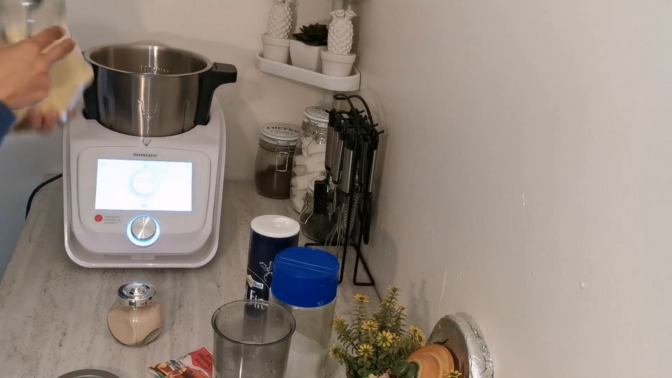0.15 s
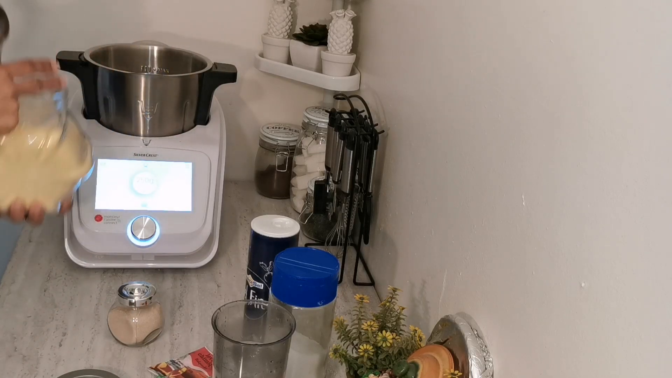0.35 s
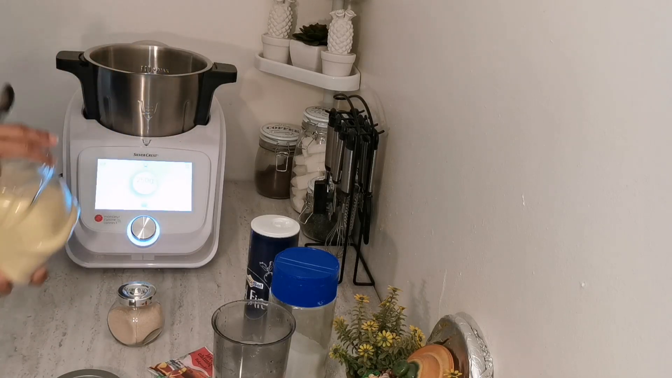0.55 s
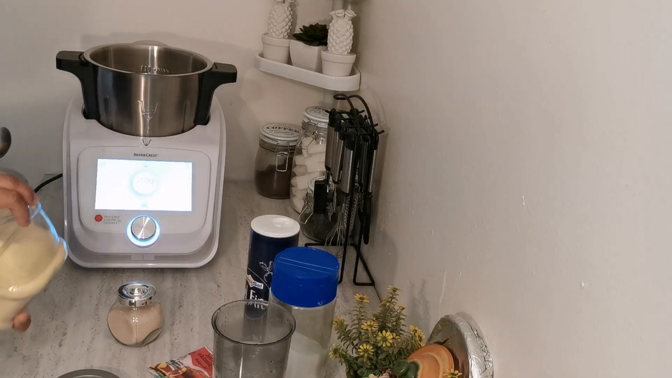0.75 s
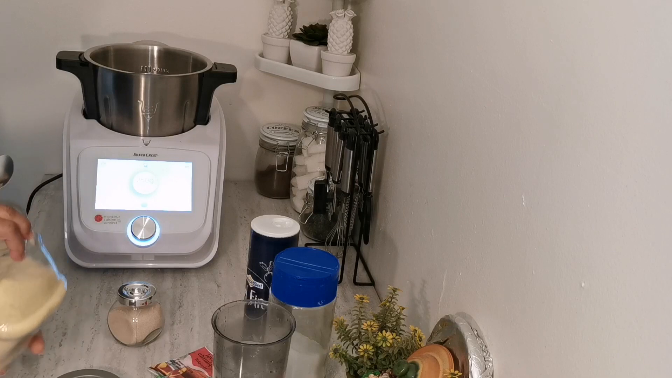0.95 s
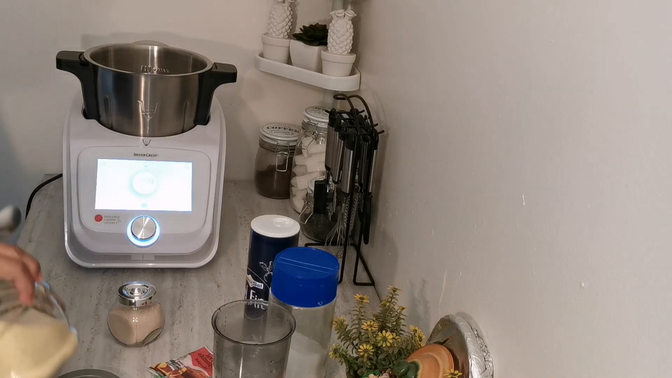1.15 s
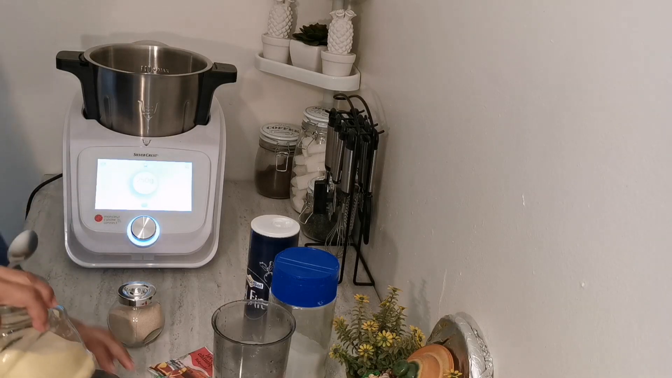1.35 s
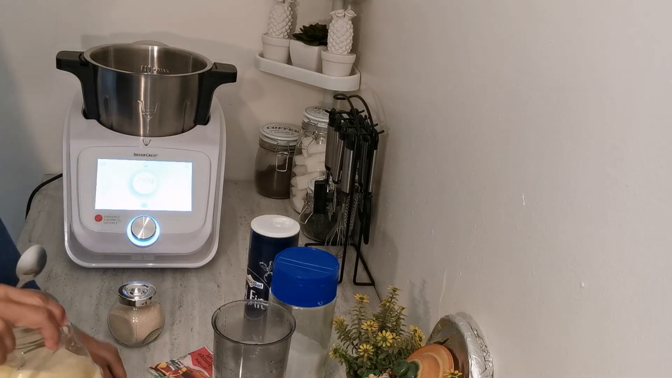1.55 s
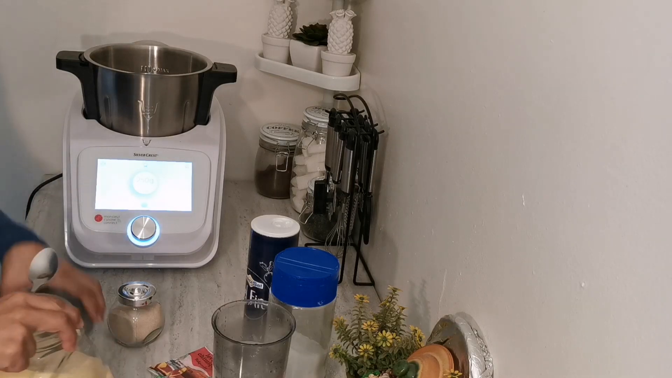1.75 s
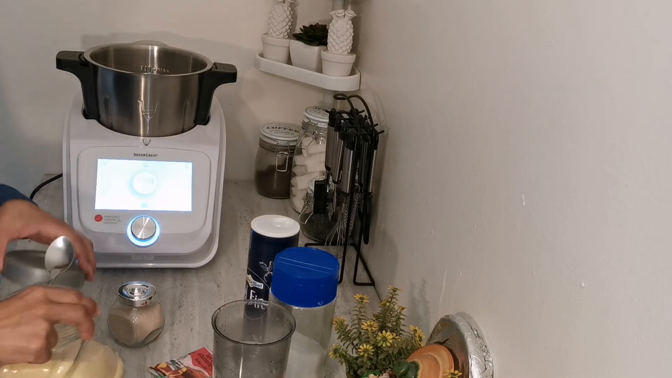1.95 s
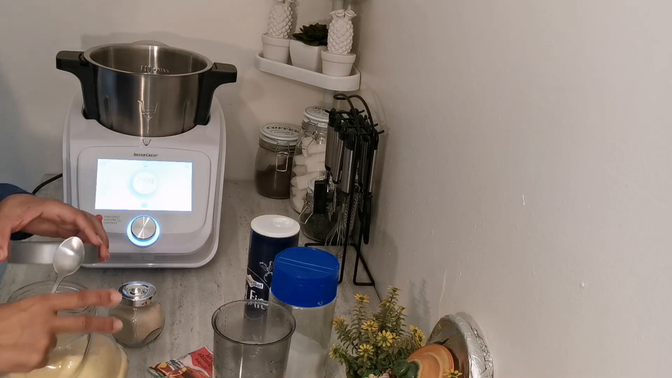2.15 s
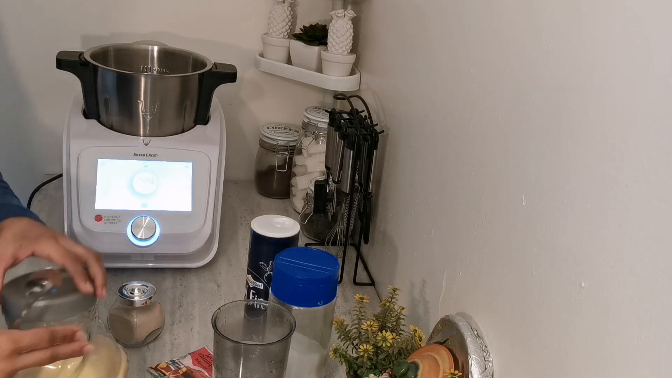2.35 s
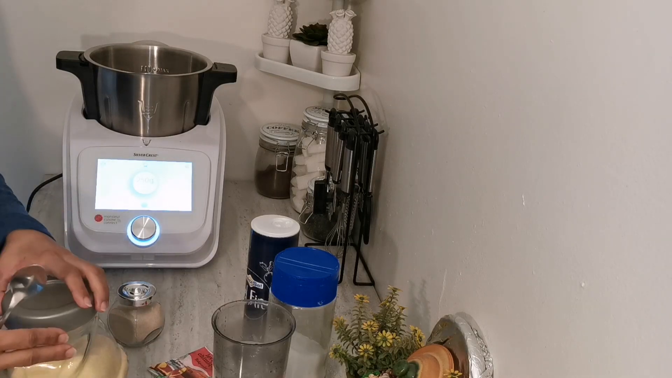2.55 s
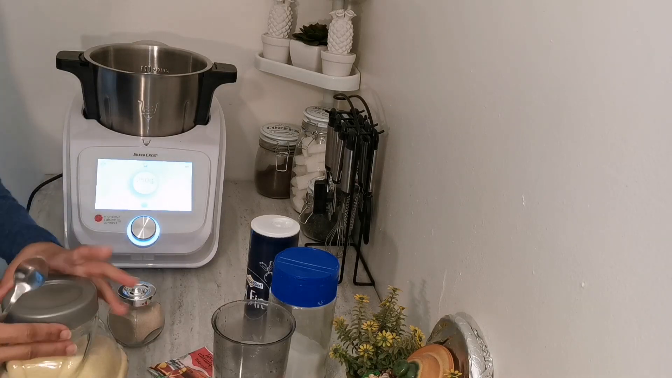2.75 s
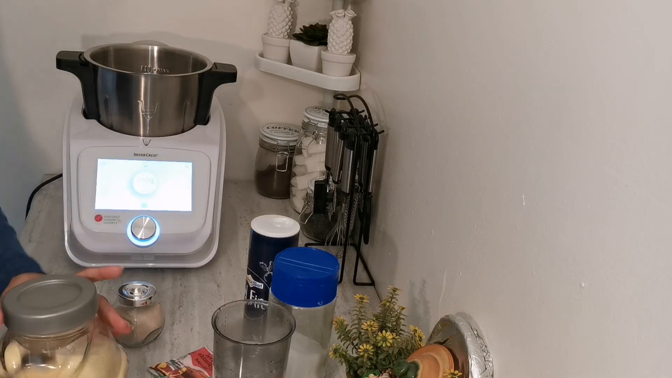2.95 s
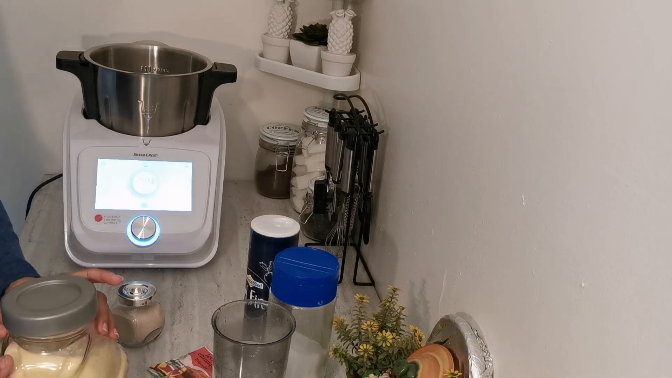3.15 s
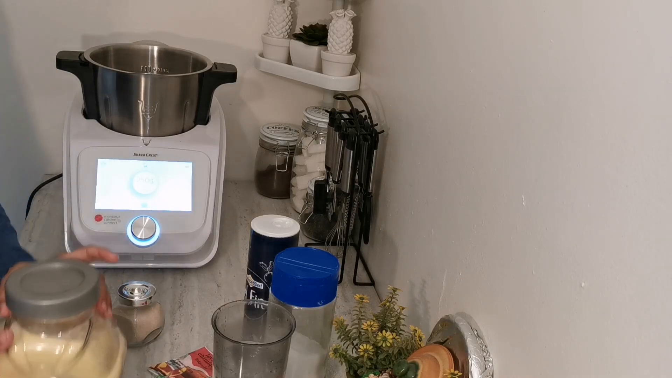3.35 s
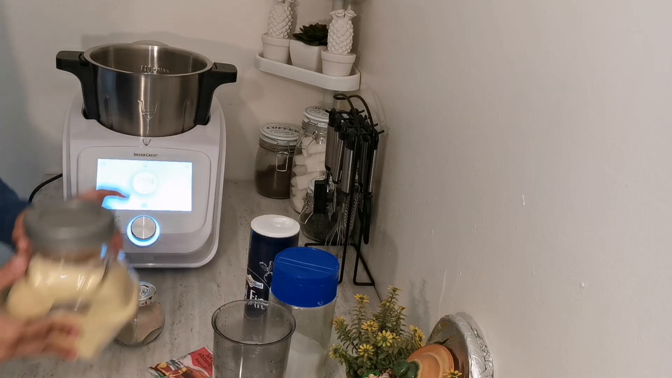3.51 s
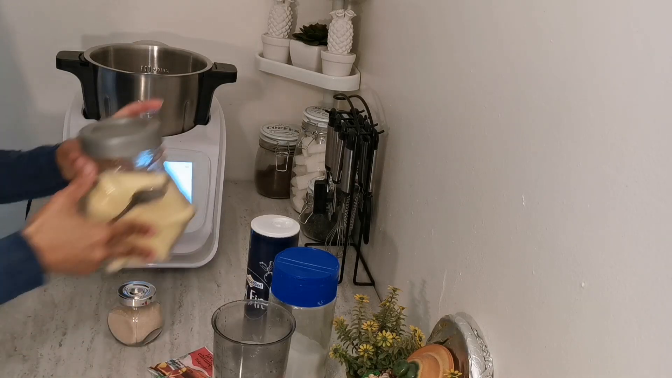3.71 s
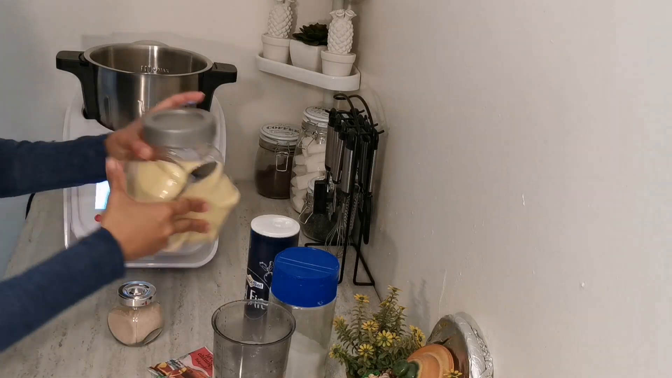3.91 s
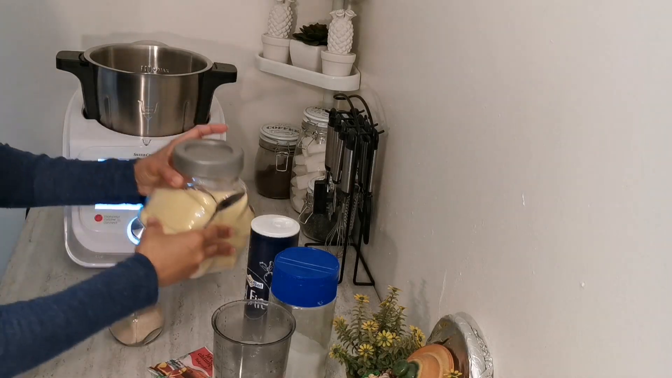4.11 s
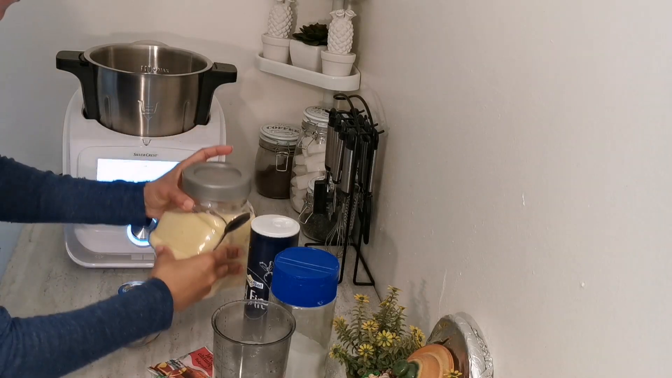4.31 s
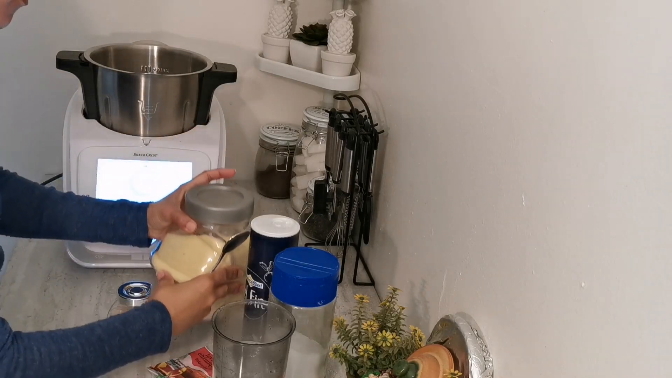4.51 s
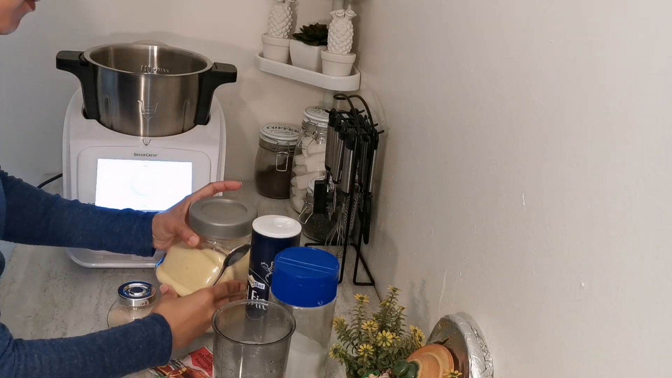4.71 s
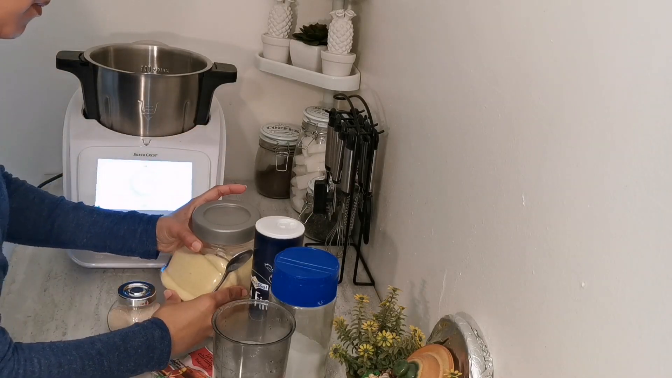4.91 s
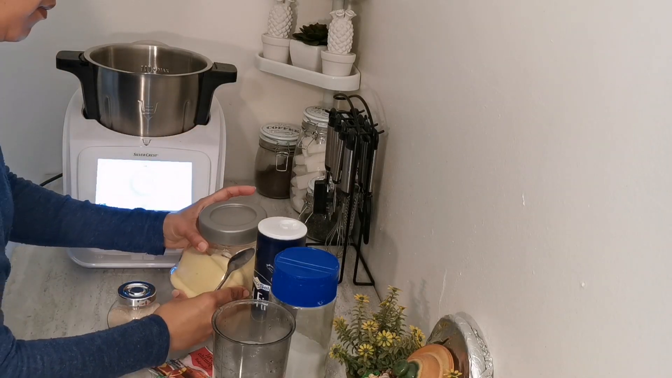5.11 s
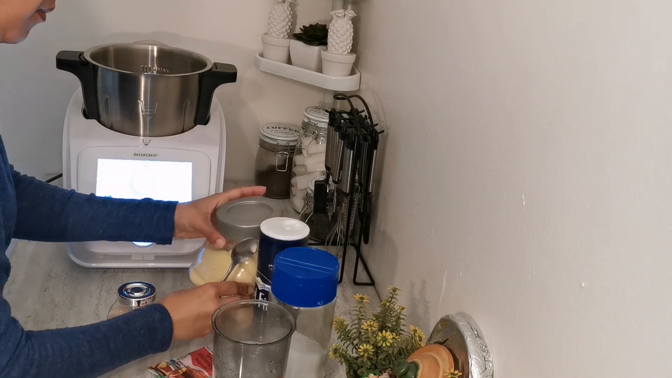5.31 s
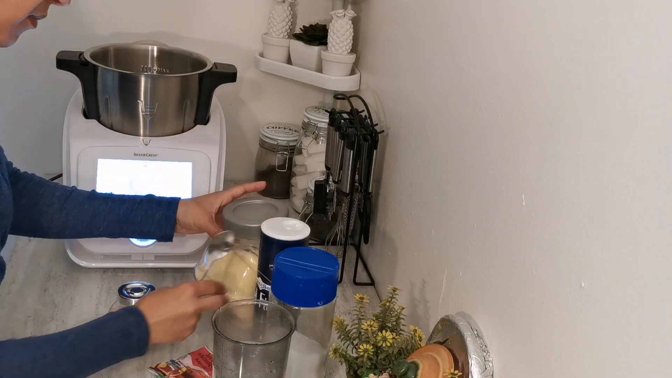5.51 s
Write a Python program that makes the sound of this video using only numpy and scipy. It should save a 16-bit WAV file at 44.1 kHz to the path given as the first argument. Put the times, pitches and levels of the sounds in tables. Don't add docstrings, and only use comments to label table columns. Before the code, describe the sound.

In a small tiled kitchen with faint fan noise, a metal spoon clinks once on a full glass jar. A thin lid scrapes and taps, the jar lands with a hollow thud and rocks, and the spoon ticks brightly on the lid. The lid is pressed and turned with small knocks. After a quiet gap the jar is thumped down further back, nudged and rocked. Close stereo microphone, leaning slightly right.

```python
import sys
import numpy as np
from scipy import signal
from scipy.fft import rfft, irfft, next_fast_len
from scipy.io import wavfile
from scipy.ndimage import map_coordinates

SR = 44100
rng = np.random.default_rng(int(sys.argv[2]) if len(sys.argv) > 2 else 0)


def transcribe(signal):
    frames = np.atleast_2d(signal).T
    limited = np.clip(frames, -1, 1)
    pcm = np.round(limited * 32767).astype(np.int16)
    wavfile.write(sys.argv[1], SR, pcm)


def invert_db(x):
    u = np.asarray(x, float) / 20
    return 10 ** u


N = 245637

TAIL = 2 * SR // 5
HELD = 0.16
RUN_UP_DB = 12
RUMBLE_DB, RUMBLE_GROWS_DB_PER_S = -58.5, 0.6
FAN_DB, WHIR_DB = -73, -84
BASS_CUT_HZ = 45
SNAP_S, SNAP_DB = 2.2632, -33

# (frequency [Hz], density [dB/Hz])
LOW_AIR = [(12, -38.5), (20, 9.5), (59, 2.5), (76, -11), (107, 0.5), (151, -11), (167, -11), (203, -6.5),
           (238, -17), (274, -10), (297, -31), (325, -13.5), (450, -47.5), (580, -49), (990, -120)]
FAN = [(180, -32.5), (300, -5.5), (476, -6.5), (517, 0.5), (571, -8.5), (755, -6.5), (820, -6),
       (1140, -12.5), (1670, -9.5), (2170, -11.5), (2360, -14.5), (4950, -18), (7110, -27), (8380, -22),
       (15400, -31)]
# (centre [Hz], half-width [Hz])
WHIR = (1690, 150)
# (frequency [Hz], correlation [-1..1])
AIR_ALIKE = [(60, 0.66), (180, 0.82), (550, 0.15), (1650, -0.11), (4970, 0.055), (15000, -0.087)]
ROOM_ALIKE = [(100, 1), (300, 0.82), (700, 0.46), (1500, -0.11), (4000, -0.0063)]
# (frequency [Hz], t60 [s])
KITCHEN_T60 = [(100, 0.45), (400, 0.29), (2000, 0.41), (6000, 0.39), (14000, 0.31)]
# (frequency [Hz], L-R [dB])
LEAN = [(100, -3.5), (1000, -3.5), (3000, -3), (10000, -7)]

# (time [s], peak [dB], L-R [dB])
SPOON_ON_GLASS = [
    (0.7203, -27.5, -3),
]
SPOON_ON_LID = [
    (2.2626, -20.5, 0),
]
# (time [s], peak [dB])
GLASS_RINGS = [
    (0.72, -41.5),
]
LID_RINGS = [
    (1.707, -32.5),
]
LID_BUMPS = [
    (1.68, -32),
]
SPOON_RINGS = [
    (2.2635, -44.5),
]
# (frequency [Hz], level [dB], t60 [s])
GLASS_HELD = [(1516, -12, 0.37), (2325, -7, 0.24), (2740, -10.5, 0.3), (3490, 4, 0.097), (4320, 2.5, 0.17),
              (4375, -3.5, 0.25), (4750, -10, 0.31), (4870, 0, 0.19), (5380, -13, 0.14), (6230, -12, 0.25),
              (6440, -8, 0.13), (8000, -13, 0.16), (8130, -4, 0.36), (8600, -26, 0.68), (9170, -13, 0.3),
              (10420, -69, 5.0), (10750, -6, 0.22), (11300, -23, 0.18), (12300, -16, 0.28),
              (12300, -26, 0.2)]
GLASS_BELL = [(4200, -15, 0.29), (4190, -10, 0.27), (4300, -12, 0.18), (5070, -14, 0.14), (5920, -10, 0.13),
              (7860, -22, 0.3), (8380, -6.5, 0.42), (606, -12, 0.13), (385, -2.5, 0.038),
              (916, -6.5, 0.036)]
GLASS_RING = [(2780, -16, .15), (3430, -6, .13), (4262, -7, .25), (4277, -7, .25), (4309, -4, .27),
              (4333, 2, .3), (4374, -6, .25), (4447, -11, .27), (4900, -11, .22), (4972, -10, .25),
              (4530, -9, .25), (5920, -13, .3), (8296, -11, .26), (8344, -8, .28)]
SPOON_HELD = [(2177, -4.5, 0.3), (4145, -9.5, 0.46), (4820, -3, 0.28), (5036, 4, 0.25), (5730, -13, 0.18),
              (6420, -2.5, 0.19), (7000, -13, 0.12), (7590, -4.5, 0.28), (8390, -0.5, 0.25),
              (10940, -3.5, 0.23), (11400, -28, 0.21)]
SPOON_BELL = [(2207, -5, .35), (2950, -7, .25), (3300, -12, .25), (4818, -3, .26), (5076, -1, .27),
              (5335, -6, .35), (5642, -8, .3), (6342, -6, .36), (7515, -9, .31), (8236, -7, .32),
              (8905, -7, .25), (10950, -7, .3), (11600, -10, .24), (12830, -13, .21)]
LID_HELD = [(865, -4, 0.4), (891, 4.5, 0.61), (930, 1.5, 0.63), (1010, 2, 0.5), (1260, -3, 0.22),
            (1440, -7, 0.098), (1400, -11, 0.34), (1810, -18, 0.11), (1958, -15.5, 0.6), (2170, -13, 0.059),
            (2400, -18, 0.11), (2770, -20.5, 0.062)]
LID_BELL = [(872, -7.5, 0.16), (942, -6.5, 0.25), (956, -4, 0.41), (1460, -10, 0.19), (1403, -6.5, .26),
            (1730, -14, 0.27), (2060, -20.5, 0.27), (2455, -11, 0.34), (2630, -19.5, 0.52)]
LID_BUMP = [(850, -4, .1), (1010, -3, .1), (1280, 0, .14), (1400, -3, .12), (1500, -4, .1),
            (2560, -10, .12), (2760, -13, .1)]
# (frequency [Hz], density [dB/Hz])
GLASS_CRACK = [(1060, -76), (1800, -59), (2060, -5.5), (2520, -41), (2830, -2.5), (3470, -25), (3960, -51),
               (4180, -12), (4350, 7), (4650, -2.5), (5000, -3), (6930, -17.5), (8210, -9), (10200, -29),
               (10800, -19), (13100, -24), (15000, -93)]
SPOON_CRACK = [(1200, -48), (1800, -10.5), (2200, -9), (2900, -6), (3500, -11), (3900, -14), (4300, -9.5),
               (5100, -5.5), (5900, -8.5), (7000, -11), (7700, -12), (8000, -11), (8300, -6), (9500, -4.5),
               (10150, -14), (10700, -4.5), (11400, -12), (12000, -10.5), (14300, -16.5), (14900, -39.5)]
SNAP = [(1500, -40), (3000, -6), (10000, 0), (15000, -7.5), (16200, -40)]
LID_TICK = [(880, -27), (1500, 5.5), (1620, -2), (2500, 2), (2730, -5.5), (3750, -8.5), (5610, -26.5),
            (7940, -30), (8660, -23.5), (15000, -57)]
THREAD_CLICK = [(1470, -31.5), (2500, -5.5), (3430, -19), (3950, -7.5), (4870, -7.5), (5170, -7.5),
                (6930, -16.5), (8740, -12), (12100, -21.5), (15000, -39)]
JAR_TICK = [(760, -43), (1300, -18.5), (1550, -5), (1640, -10.5), (1800, -7.5), (2170, -13), (2330, -14),
            (4580, -24.5), (5910, -38), (8460, -35), (15000, -62.5)]
# (time [s], pitch [Hz], peak [dB])
KNUCKLES = [(0.7208, 385, -60), (1.683, 1400, -43.5), (2.553, 240, -36.5), (2.693, 161, -40),
            (4.884, 250, -18.5), (5.142, 1050, -40), (5.147, 1500, -48), (2.695, 700, -47),
            (2.73, 755, -49), (4.889, 1553, -36.5), (5.415, 255, -30.5), (5.475, 255, -42)]

# (time [s], peak [dB], tick [dB], hardness [dB/octave])
LID_TAPS = [
    (1.574, -54.5, -81, -12.5),
    (1.584, -47.5, -75, -17),
    (1.68, -29.5, -44, 11),
    (1.707, -27.5, -33.5, 11),
    (1.729, -46, -43.5, -10.5),
]
# (time [s], peak [dB])
THREAD = [
    (1.705, -59.5),
    (2.5101, -47),
    (2.5561, -35.5),
    (2.5642, -41),
    (2.6595, -50.5),
    (2.85, -54),
]
# (time [s], run-up [s], hold [s], level [dB])
LID_LIFT = [
    (1.582, 0.016, 0.081, -58),
]
# (frequency [Hz], density [dB/Hz])
LID_RUB = [(450, -48.5), (600, 2), (700, -13.5), (850, 2), (950, -13), (1060, -1), (1200, -25), (2000, -18),
           (3000, -61)]

# (top speed [s], run-up [s], hold [s], rasp [dB], hiss re rasp [dB])
SLIDES = [(1.592, 0.032, 0.071, -69.5, -5), (1.697, 0.012, .005, -62.5, 0.5),
          (1.964, 0.082, 0.3, -55.5, -14), (2.122, 0.051, 0.052, -50, -9), (2.564, 0.047, 0.004, -54, -1),
          (2.67, 0.043, 0.083, -75, -4), (2.834, 0.021, 0.08, -73.5, -2.5), (4.93, 0.05, 0.44, -54, -14),
          (5.431, 0.085, 0.061, -47.5, -5.5), (5.335, 0.059, .03, -62.5, -0.5),
          (2.052, 0.055, 0.036, -65, -0.5)]
# (time [s], run-up [s], level [dB])
SHUDDER = [(1.76, 0.11, -54), (2.004, 0.043, -35), (2.14, 0.02, -33.5), (2.2, .03, -47), (2.972, 0.16, -50),
           (3.152, 0.077, -56.5), (3.386, 0.085, -59), (4.98, 0.016, -36.5), (5.095, 0.046, -38),
           (5.16, 0.047, -27.5), (5.42, 0.075, -33.5)]
# (frequency [Hz], density [dB/Hz])
JUDDER = [(24, -41), (40, -3), (113, 7.5), (141, 3.5), (195, -3), (254, -4), (298, -9.5), (500, -27.5),
          (650, -69), (1100, -120)]
RASP = [(210, -22.5), (350, -2.5), (650, 8), (900, 3.5), (1150, -0.5), (1550, -2), (2100, -9),
        (3000, -19.5), (3900, -38.5), (6600, -120)]
HISS = [(1290, -10.5), (2200, -6), (2930, -5), (3590, -5), (3960, -6), (4120, -7.5), (4690, -6),
        (5300, -12), (5800, -18), (7700, -17.5), (8450, -7.5), (9100, -19), (9700, -22), (10500, -21.5),
        (14000, -31.5), (15400, -38.5)]

# (time [s], knock peak [dB], cabinet boom [dB], slab ring [dB])
SET_DOWN = [
    (1.888, -12.5, -18.5, -22),
    (1.98, -28.5, -45, -39.5),
    (2.002, -34, -31, -45.5),
]
SETTLE = [
    (2.111, -15, -19.5, -35),
    (2.115, -48, -42, -25),
    (2.177, -25, -28.5, -42.5),
    (2.22, -42, -39, -43.5),
    (2.258, -53, -45, -43.5),
]
LID_PRESS = [
    (2.508, -53, -51, -57),
    (2.542, -38.5, -47, -35.5),
    (2.566, -24, -34, -35),
    (2.599, -48, -72, -42.5),
]
LID_TURN = [
    (2.661, -26.5, -36.5, -35.5),
    (2.688, -43, -41.5, -46),
]
LID_SHUT = [
    (2.847, -33, -43.5, -40.5),
    (2.966, -44, -48, -62),
    (3.149, -87, -57, -66),
]
PUT_BACK = [
    (4.875, -10, -12, -9),
    (4.884, -24, -52, -21),
    (4.929, -27, -43, -38),
    (4.98, -40, -38, -58.5),
]
NUDGE = [
    (5.094, -39, -51, -47),
    (5.139, -17, -19, -25),
    (5.143, -38.5, -40, -22.5),
]
ROCK = [
    (5.369, -20.5, -29.5, -33),
    (5.405, -45, -28.5, -37),
    (5.44, -60, -52, -43),
    (5.49, -48, -36, -64),
]
# (frequency [Hz], level [dB], t60 [s])
SLAB_FRONT = [(385, -4, 0.083), (519, -2.5, 0.082), (595, -4, 0.061), (700, -13.5, 0.12),
              (777, -12.5, 0.089), (987, -12.5, 0.062), (1206, -22, 0.071), (1380, -19.5, 0.044),
              (1690, -43, 0.035), (1840, -34, 0.089)]
SLAB_TILTED = [(345, 3.5, 0.053), (509, 2, 0.069), (574, -6, 0.083), (716, -8, 0.098), (863, -7.5, 0.07),
               (1005, -8.5, 0.068), (1197, -11, 0.068), (1417, -11, 0.059), (1600, -18, 0.053),
               (1836, -24, 0.12)]
SHUT_JAR = [(321, 4, 0.11), (505, -1.5, 0.11), (674, 0.5, 0.08), (794, -4, 0.1), (905, 1, 0.1),
            (1070, -5, 0.12), (1650, -6.5, 0.067), (1940, -5.5, 0.053), (2310, -11.5, 0.097)]
TURNING_JAR = [(310, 8, 0.059), (444, -0.5, 0.093), (627, 0.5, 0.18), (688, -0.5, 0.23), (872, -1.5, 0.15),
               (1084, -17, 0.13), (1430, -17, 0.05), (1966, -3.5, 0.055), (2260, -15, .065)]
TIGHT_JAR = [(312, 9.5, 0.12), (480, 0, 0.1), (706, -1, 0.17), (826, -0.5, 0.16), (905, 1.5, 0.14),
             (1050, -2.5, 0.16), (1665, -8.5, .056), (1940, -12, 0.084), (2300, -27, 0.05)]
SLAB_BACK = [(357, -3.5, 0.066), (386, 4.5, 0.041), (469, 2.5, 0.052), (580, -10, 0.075), (624, -6, 0.098),
             (766, -9.5, 0.12), (867, -10, 0.083), (982, -17, 0.16), (1124, -15, 0.11), (1410, -19, 0.049),
             (1538, -13.5, 0.067), (1690, -17.5, 0.024)]
SLAB_CORNER = [(340, -6, 0.12), (401, 1.5, 0.12), (577, 2, 0.091), (487, -2, 0.093), (786, -6, 0.072),
               (1017, -9, 0.14), (1093, -4.5, 0.099), (1500, -13, 0.054), (1860, -21.5, 0.077)]
SLAB_EDGE = [(356, 2, 0.096), (500, 1, 0.11), (612, -4, 0.25), (643, -1.5, 0.23), (727, -0.5, 0.13),
             (918, -7.5, 0.22), (1144, -4.5, 0.22), (1410, -18, 0.068), (1720, -14, 0.051)]
# (frequency [Hz], level [dB], t60 [s])
CABINET = [(61.4, -11.5, 0.17), (74, -5.5, 0.16), (93, -4, 0.23), (131.5, -1.5, 0.26), (160, -3, 0.15),
           (195, -3, 0.12)]
CABINET_FRONT = [(60, -2.5, 0.29), (80.8, 5.5, 0.18), (101, -12, 0.58), (152, -5.5, 0.29),
                 (207.4, -2, 0.22), (255, -11, 0.56)]
CABINET_ROCKED = [(62, -8.5, 0.23), (72, -13, 0.15), (93.7, -9, 0.43), (147, -8, 0.29), (189.3, -4.5, 0.13),
                  (254.9, -12, 0.29)]
CABINET_BACK = [(66.4, 1.5, 0.23), (85, 4, 0.092), (93.8, -10, 0.57), (146.7, -3.5, 0.2), (250, -7, 0.38),
                (179, -14.5, 0.36)]
CABINET_CORNER = [(59, -9, .25), (97, 0, .6), (130, -13, .2), (194, -10, .3), (255, -8, .35),
                  (345, -12, .4)]
CABINET_EDGE = [(60, -4, .5), (92, -16, .4), (135, 0, .35), (180, -7, .12), (258, -3, .4), (345, -16, .1)]
# (time [s], level [dB])
GRIT = [
    (2.567, -20),
    (4.883, -14.5),
    (4.929, -24),
    (5.408, -31),
    (5.448, -25),
    (5.499, -28),
]

# (time [s], run-up [s], hold [s], level [dB])
GRIP = [
    (3.032, 0.092, 2, -76.5),
    (3.354, 0.038, 0.0042, -64.5),
]
# (time [s], run-up [s], level [dB])
BRUSH = [(3.226, .07, -84), (3.352, 0.025, -80), (3.668, .06, -85), (4.01, 0.082, -83), (4.356, .2, -77),
         (4.786, .12, -81), (5.018, .003, -72)]
# (frequency [Hz], density [dB/Hz])
SKIN = [(210, -37), (350, -8), (673, -4.5), (864, -9), (1360, -9), (2430, -11), (2710, -12.5),
        (6000, -25.5), (7800, -45), (13200, -120)]
SLEEVE = [(3240, -27), (5500, -3), (5690, -15), (6970, -6.5), (7840, -5), (9040, -4.5), (9760, -8),
          (15400, -14.5)]


def unit(x):
    return x / np.sqrt(np.mean(x ** 2) + 1e-20)


def along(points, hz):
    f, v = np.transpose(points)
    return np.interp(np.log(hz + 1), np.log(f + 1), v)


def wobble(rate_hz):
    knots = rng.standard_normal(int(N * rate_hz / SR) + 4)
    return map_coordinates(knots, [np.arange(N) * rate_hz / SR])


def filtered(x, response):
    n = x.shape[-1]
    m = next_fast_len(n + 8192)
    return irfft(rfft(x, m) * response(np.fft.rfftfreq(m, 1 / SR)), m)[..., :n]


def mid_side_gains(alike, hz):
    turn = np.arccos(np.clip(along(alike, hz), -1, 1)) / 2
    return np.array([np.cos(turn), np.sin(turn)])


def rush(spectrum, alike, grit_db=0, rate_hz=200):
    two = rng.standard_normal((2, N)) * invert_db(grit_db * wobble(rate_hz))
    mid, side = filtered(two, lambda hz: mid_side_gains(alike, hz))
    stereo = np.array([mid + side, mid - side])
    return unit(filtered(stereo, lambda hz: invert_db(along(spectrum, hz))))


def strokes(s, run_up, db, fall_db_per_s, hold=0):
    t = np.arange(0, N / SR, 0.001)
    late = t - s[:, None]
    climb = RUN_UP_DB * (np.minimum(late, 0) / np.abs(run_up)[:, None]) ** 2
    fall = fall_db_per_s * np.maximum(late - np.abs(hold + 0 * s)[:, None], 0)
    power = np.sum(invert_db(2 * (db[:, None] - climb - fall)), 0)
    return np.interp(np.arange(N) / SR, t, np.sqrt(power))


def ring(modes, rise, spread_db, damp=1, tilt_db=0):
    t = np.arange(TAIL) / SR
    hz, level, t60 = np.transpose(modes)[:, :, None]
    level = level + spread_db * rng.standard_normal(hz.shape) + tilt_db * np.log2(hz)
    decay = invert_db(level - 60 * t / (damp * np.clip(t60, 0.01, 0.6)))
    x = np.sum(decay * np.sin(2 * np.pi * hz * t), 0)
    x = x * (1 - np.exp(-t / rise)) ** 2
    return x / np.abs(x).max()


def crack(spectrum):
    hz = np.fft.rfftfreq(2048, 1 / SR)
    c = irfft(np.log(invert_db(along(spectrum, hz)) + 1e-5))
    c[1:1024] = 2 * c[1:1024]
    c[1025:] = 0
    x = irfft(np.exp(rfft(c)))
    return np.pad(x / np.linalg.norm(x), (0, TAIL - len(x)))


def add(out, s, hit, wet_db, pan_db=0, dry=1):
    hz, t, z = signal.stft(rng.standard_normal((2, TAIL)), SR, nperseg=256)
    decay = invert_db(-60 * t / along(KITCHEN_T60, hz)[:, None])
    mid, side = z * decay * mid_side_gains(ROOM_ALIKE, hz)[:, :, None]
    tail = signal.istft(np.array([mid + side, mid - side]), SR, nperseg=256)[1][:, :TAIL]
    age = np.arange(TAIL) / SR
    tail = tail * (1 - np.exp(-age / 0.0024)) * (1 + 1.17 * np.exp(-age / 0.0092))
    wet = signal.fftconvolve(hit[None], tail / np.linalg.norm(tail[0]), axes=1)[:, :TAIL]
    start = round(s * SR)
    out[:, start:start + TAIL] += (dry * hit + invert_db(wet_db) * wet) * invert_db([[pan_db / 2], [-pan_db / 2]])


def air():
    swell_db = 0.8 * wobble(6)
    growth_db = RUMBLE_GROWS_DB_PER_S * np.arange(N) / SR
    rumble = invert_db(RUMBLE_DB + growth_db + swell_db) * rush(LOW_AIR, AIR_ALIKE)
    hz, width = WHIR
    whir = invert_db(WHIR_DB) * rush([(hz - width, -40), (hz, 0), (hz + width, -40)], AIR_ALIKE)
    return rumble + whir + invert_db(FAN_DB - 0.5) * rush(FAN, AIR_ALIKE)


def spoon():
    out = np.zeros((2, N + TAIL))
    for s, db, pan_db in SPOON_ON_GLASS:
        held = ring(GLASS_HELD, rise=0.00065, spread_db=0, damp=HELD)
        add(out, s, invert_db(db - 13.5) * held, wet_db=12.0, pan_db=pan_db + 7.5)
        add(out, s, invert_db(db + 3.0) * crack(GLASS_CRACK), wet_db=14.0, pan_db=pan_db + 6.0, dry=0.19)
        bell = ring(GLASS_BELL, rise=0.00061, spread_db=1.5, damp=0.52)
        add(out, s, invert_db(db - 22) * bell, wet_db=15.0, pan_db=pan_db + 5.0)
    for s, db, pan_db in SPOON_ON_LID:
        held = ring(SPOON_HELD, rise=0.00052, spread_db=0, damp=HELD)
        add(out, s, invert_db(db - 12) * held, wet_db=5.5, pan_db=pan_db - 5.5)
        add(out, s, invert_db(db - 2.0) * crack(SPOON_CRACK), wet_db=15.0, pan_db=pan_db + 6.5, dry=0.3)
    return out[:, :N]


def free_rings():
    out = np.zeros((2, N + TAIL))
    for s, db in LID_RINGS:
        hit = ring(LID_BELL, rise=0.00079, spread_db=0, damp=0.72)
        add(out, s, invert_db(db) * hit, wet_db=-6.0, pan_db=3.5)
    for s, db in SPOON_RINGS:
        hit = ring(SPOON_BELL, rise=0.00074, spread_db=0, damp=0.84)
        add(out, s, invert_db(db) * hit, wet_db=1.0, pan_db=2.5)
    for s, db in LID_BUMPS:
        hit = ring(LID_BUMP, rise=0.00072, spread_db=0, damp=0.34)
        add(out, s, invert_db(db) * hit, wet_db=3.0, pan_db=6.0)
    for s, db in GLASS_RINGS:
        hit = ring(GLASS_RING, rise=0.00066, spread_db=0, damp=0.77)
        add(out, s, invert_db(db) * hit, wet_db=0, pan_db=-11.0)
    return out[:, :N]


def contacts():
    out = np.zeros((2, N + TAIL))
    for s, hz, db in KNUCKLES:
        knock = ring([(hz, 0, 12 / hz + 0.029)], rise=0.0024, spread_db=0)
        add(out, s, invert_db(db) * knock, wet_db=-5.5, pan_db=1.0)
    add(out, SNAP_S, invert_db(SNAP_DB) * crack(SNAP), wet_db=-13, pan_db=3.5)
    return out[:, :N]


def lid():
    out = np.zeros((2, N + TAIL))
    for s, db, tick_db, hard_db in LID_TAPS:
        tin = ring(LID_HELD, rise=0.00088, spread_db=-2.5, damp=HELD / 2, tilt_db=hard_db)
        hit = invert_db(db - 2.0) * tin + invert_db(tick_db + 17) * crack(LID_TICK)
        add(out, s, hit, wet_db=4.5, pan_db=1.5, dry=0.62)
    for s, db in THREAD:
        add(out, s, invert_db(db + 6.5) * crack(THREAD_CLICK), wet_db=8, pan_db=3.0, dry=0.66)
    return out[:, :N]


def lid_scrape():
    s, run_up, hold, db = np.transpose(LID_LIFT)
    gain = strokes(s, run_up, db, fall_db_per_s=150.5, hold=hold)
    return gain * rush(LID_RUB, ROOM_ALIKE, grit_db=3.0)


def slides():
    s, run_up, hold, db, hiss_db = np.transpose(SLIDES)
    judder_gain = strokes(*np.transpose(SHUDDER), fall_db_per_s=109.0)
    judder = judder_gain * rush(JUDDER, ROOM_ALIKE, grit_db=0.66, rate_hz=16.0)
    rasp_gain = strokes(s, run_up, db, fall_db_per_s=130, hold=hold)
    rasp = rasp_gain * rush(RASP, ROOM_ALIKE, grit_db=1.5, rate_hz=110)
    hiss_gain = strokes(s, run_up, db + hiss_db, fall_db_per_s=175, hold=hold)
    hiss = hiss_gain * rush(HISS, ROOM_ALIKE, grit_db=1.0, rate_hz=120)
    return judder + rasp + hiss


def jar(events, modes, cabinet, knock_hz, tick_db, wet_db, pan_db, boom_wet_db,
        knock_rise=0.0028, slab_rise=0.00091):
    out = np.zeros((2, N + TAIL))
    for s, knock_db, boom_db, slab_db in events:
        knock = -ring([(knock_hz, 0, 0.03)], rise=knock_rise, spread_db=0)
        boom = ring(cabinet, rise=0.0066, spread_db=2.5, damp=0.65)
        add(out, s, invert_db(knock_db) * knock + invert_db(boom_db) * boom, wet_db=boom_wet_db, pan_db=pan_db)
        slab = -ring(modes, rise=slab_rise, spread_db=2.0, damp=0.46)
        slab = slab + invert_db(tick_db) * crack(JAR_TICK)
        add(out, s, invert_db(slab_db) * slab, wet_db=wet_db, pan_db=pan_db, dry=0.88)
    return out[:, :N]


def jar_in_front():
    return (jar(SET_DOWN, SLAB_FRONT, CABINET_FRONT, knock_hz=294.4, tick_db=1.5, wet_db=7.5,
                pan_db=3.0, boom_wet_db=-6.0)
            + jar(SETTLE, SLAB_TILTED, CABINET_ROCKED, knock_hz=269.5, tick_db=-5, wet_db=4.5,
                  pan_db=2.5, boom_wet_db=-6.5, slab_rise=0.001)
            + jar(LID_PRESS, SHUT_JAR, CABINET, knock_hz=258.0, tick_db=3.0, wet_db=7.5,
                  pan_db=2.3, boom_wet_db=-4.5)
            + jar(LID_TURN, TURNING_JAR, CABINET, knock_hz=266, tick_db=2.0, wet_db=6.5,
                  pan_db=1.0, boom_wet_db=-11)
            + jar(LID_SHUT, TIGHT_JAR, CABINET, knock_hz=268, tick_db=-10, wet_db=5.5,
                  pan_db=1.5, boom_wet_db=-10.5))


def grit():
    out = np.zeros((2, N + TAIL))
    for s, db in GRIT:
        add(out, s, invert_db(db) * crack(JAR_TICK), wet_db=4.5, pan_db=0.0, dry=0.65)
    return out[:, :N]


def hands():
    s, run_up, hold, db = np.transpose(GRIP)
    skin_gain = strokes(s, run_up, db, fall_db_per_s=207, hold=hold)
    skin = skin_gain * rush(SKIN, ROOM_ALIKE, grit_db=0.5)
    sleeve_gain = strokes(*np.transpose(BRUSH), fall_db_per_s=139.0)
    return skin + sleeve_gain * rush(SLEEVE, ROOM_ALIKE, grit_db=1.0)


def jar_at_back():
    return (jar(PUT_BACK, SLAB_BACK, CABINET_BACK, knock_hz=248, tick_db=-9.0, wet_db=1.5,
                pan_db=-1.0, boom_wet_db=-9.0, knock_rise=0.0021)
            + jar(NUDGE, SLAB_CORNER, CABINET_CORNER, knock_hz=242, tick_db=-14.0, wet_db=0.5,
                  pan_db=-2.0, boom_wet_db=-10.5, slab_rise=0.0015)
            + jar(ROCK, SLAB_EDGE, CABINET_EDGE, knock_hz=234, tick_db=-17.0, wet_db=3.5,
                  pan_db=-0.5, boom_wet_db=-4.5, slab_rise=0.001))


def scene():
    near = jar_in_front() + jar_at_back() + spoon() + lid() + slides() + hands()
    around = air()
    near = near + grit() + free_rings() + lid_scrape() + contacts()
    halves = np.array([[0.5], [-0.5]])
    return filtered(near, lambda hz: invert_db(halves * along(LEAN, hz))) + around


def bass_cut(hz):
    once = hz * hz / (hz * hz - 1j * np.sqrt(2) * hz * BASS_CUT_HZ - BASS_CUT_HZ ** 2)
    return once ** 2


def low_pass(x):
    return signal.sosfilt(signal.butter(12, 15580, fs=SR, output="sos"), x)


def record(dry):
    mix = filtered(dry, bass_cut)
    return low_pass(mix)


dry = scene()
out = record(dry)
transcribe(out)
```